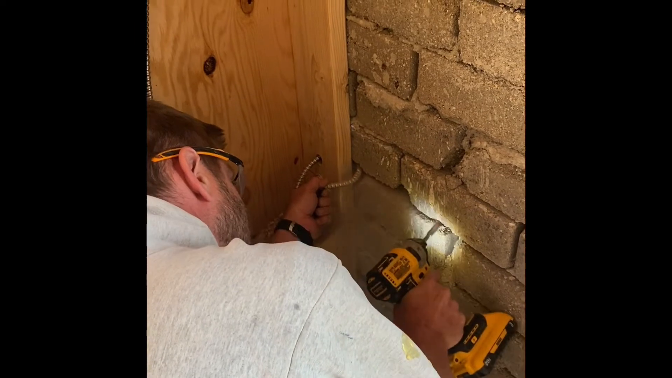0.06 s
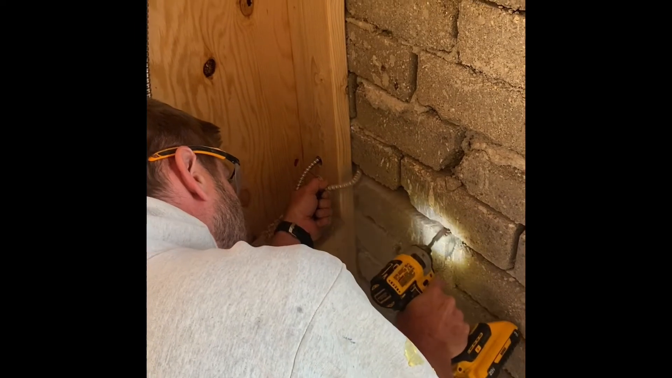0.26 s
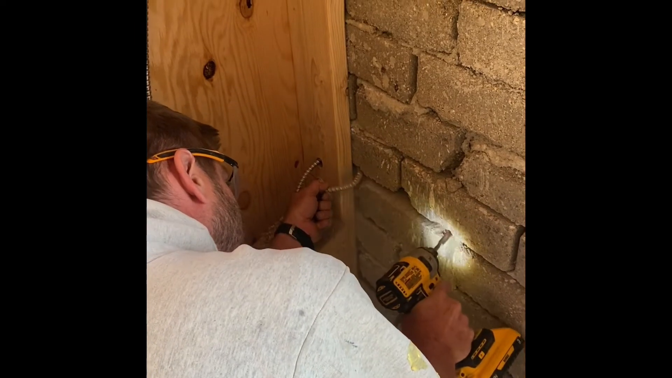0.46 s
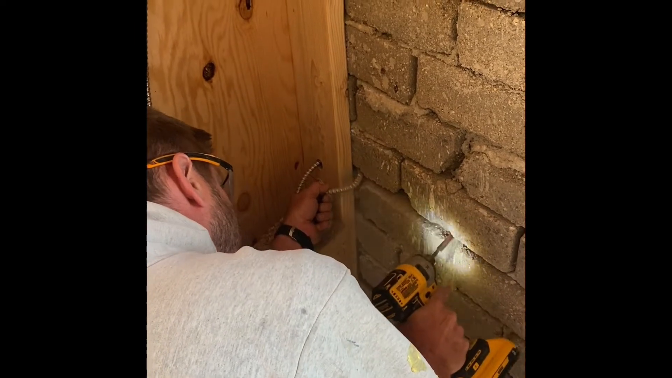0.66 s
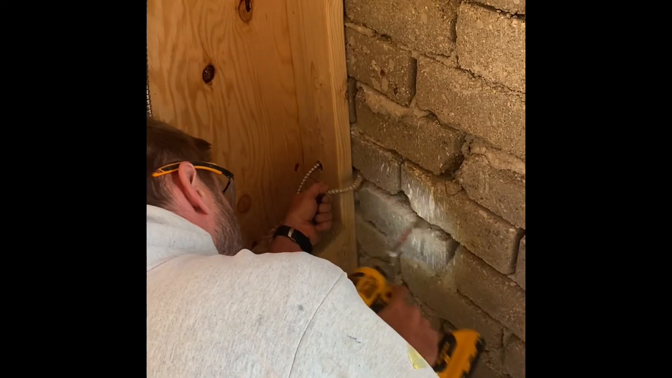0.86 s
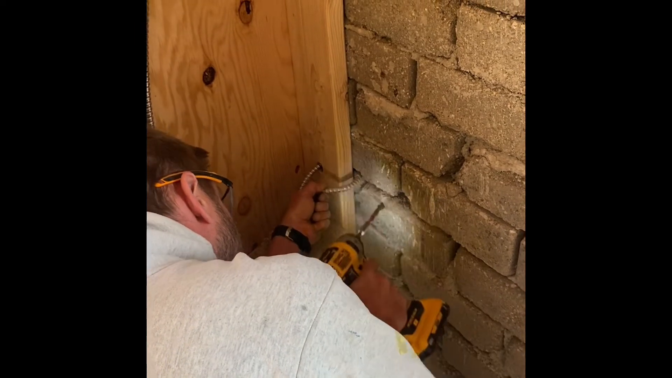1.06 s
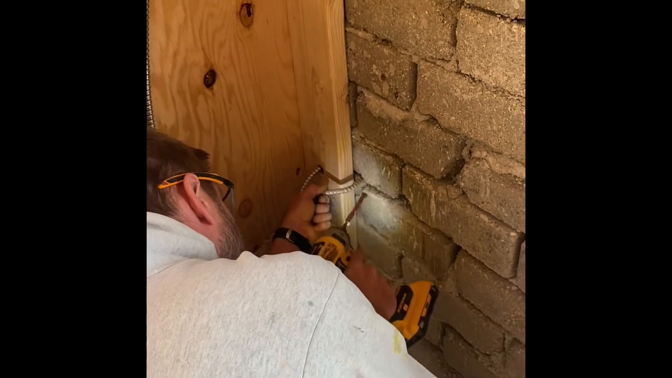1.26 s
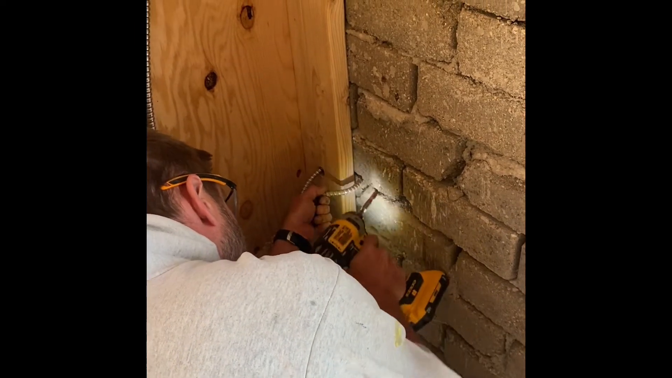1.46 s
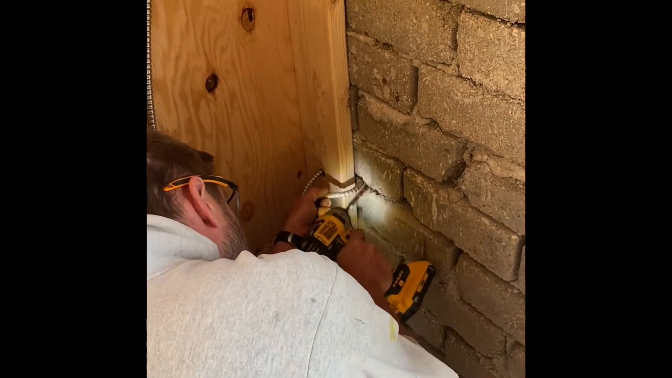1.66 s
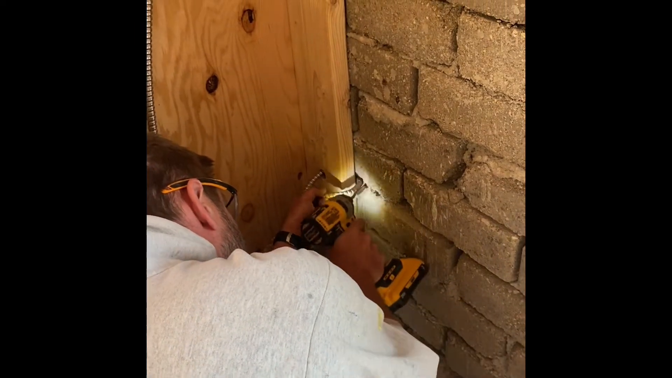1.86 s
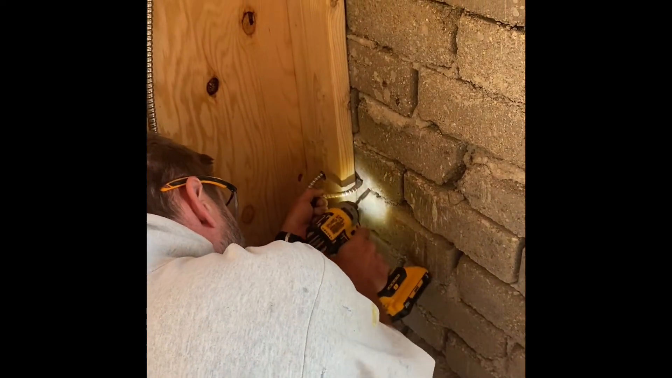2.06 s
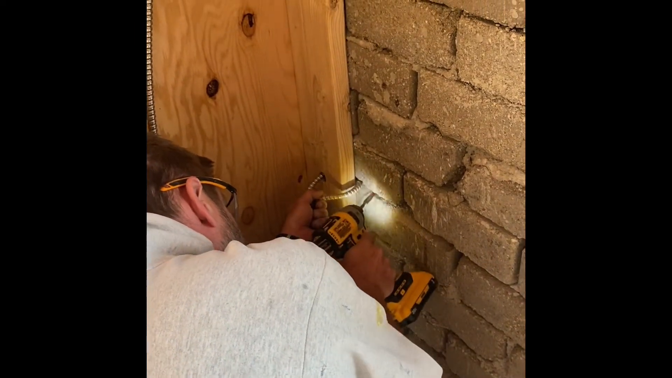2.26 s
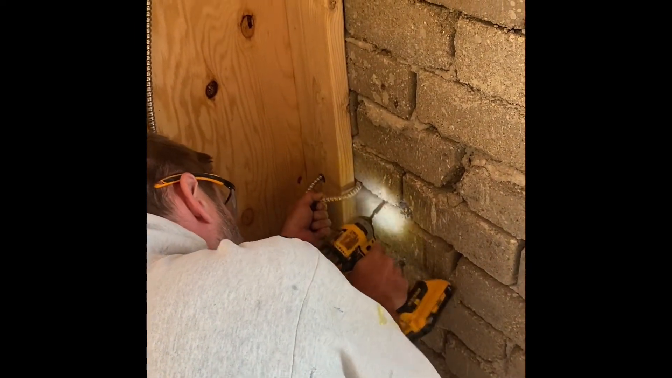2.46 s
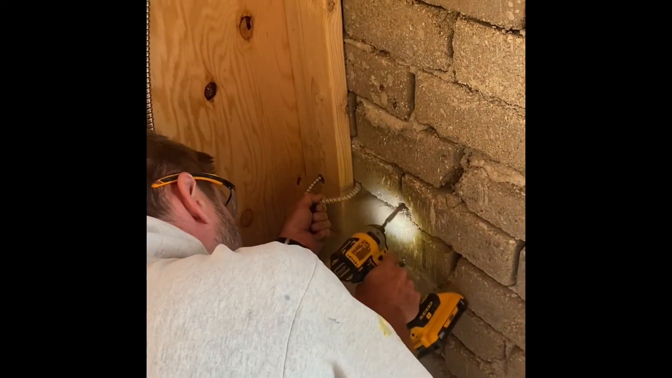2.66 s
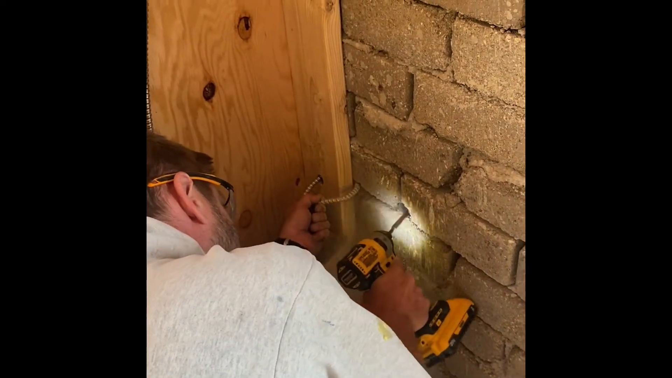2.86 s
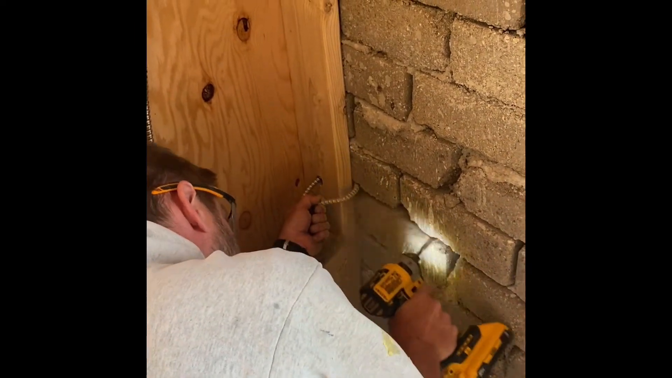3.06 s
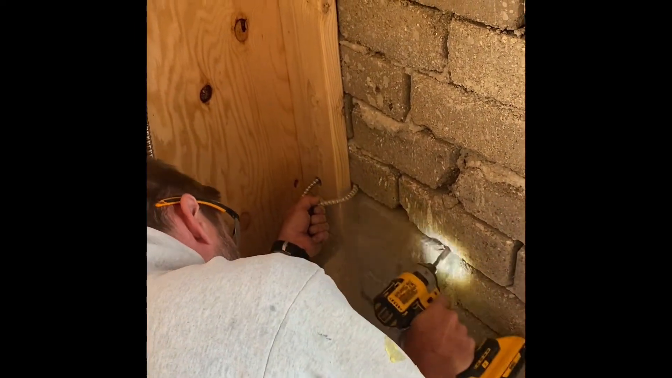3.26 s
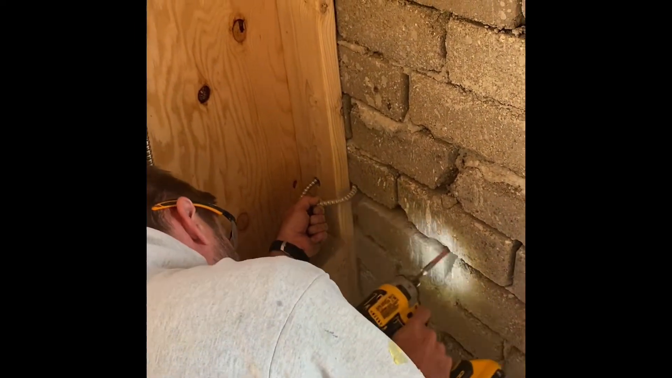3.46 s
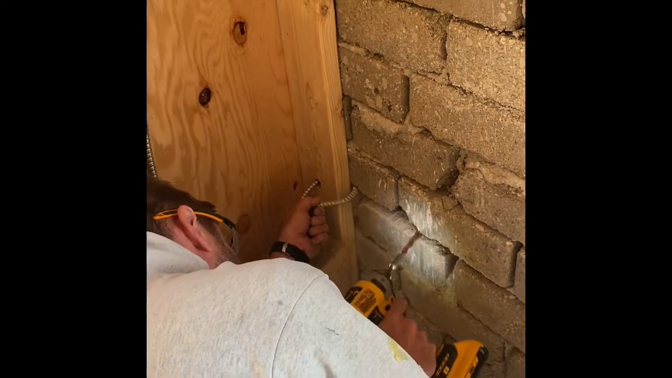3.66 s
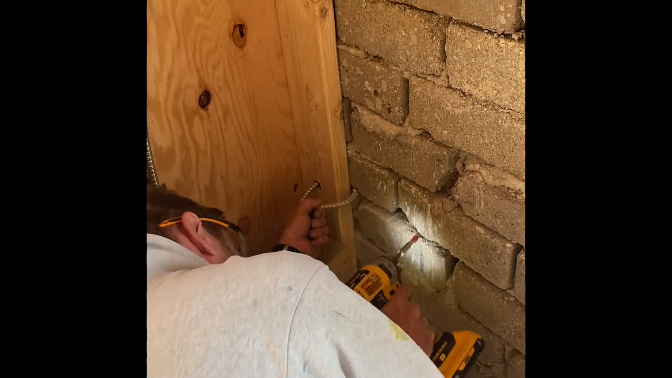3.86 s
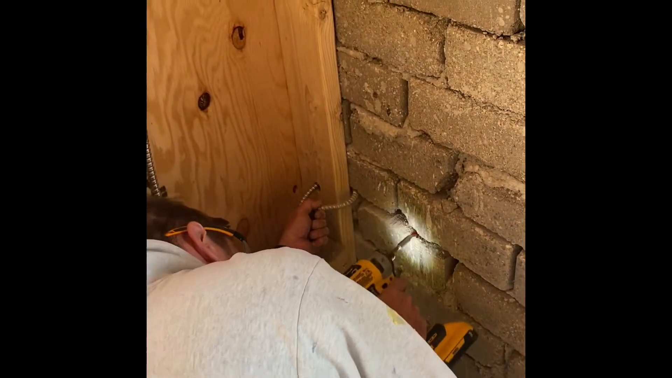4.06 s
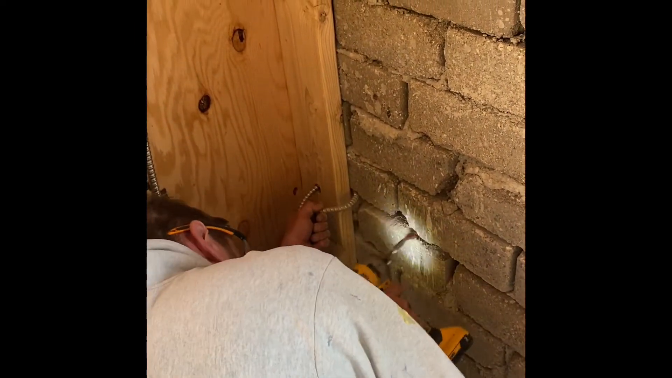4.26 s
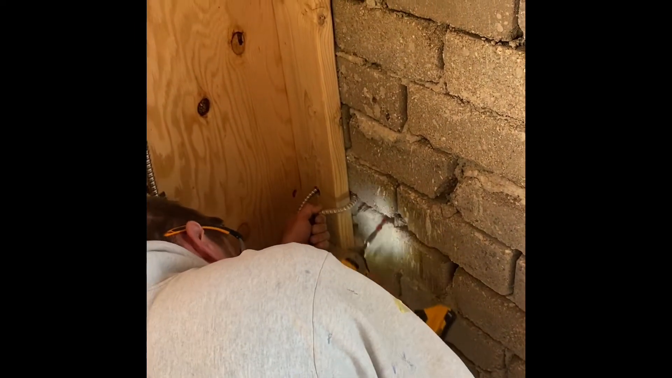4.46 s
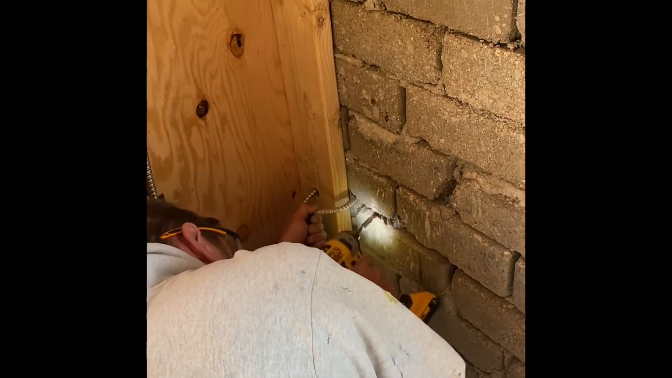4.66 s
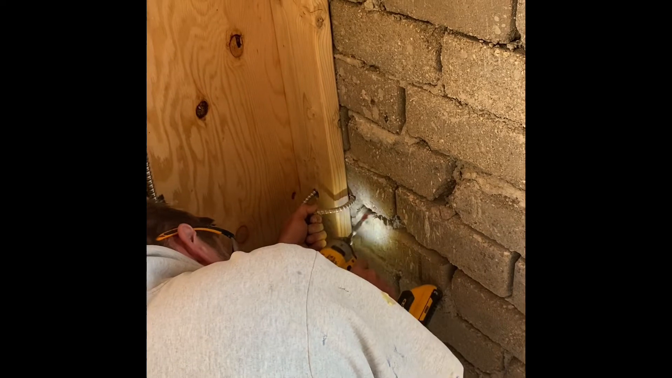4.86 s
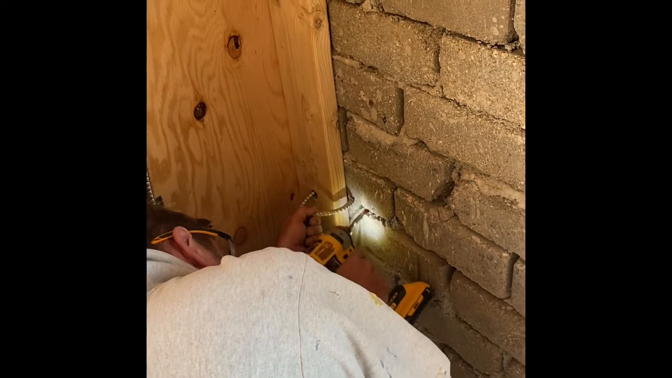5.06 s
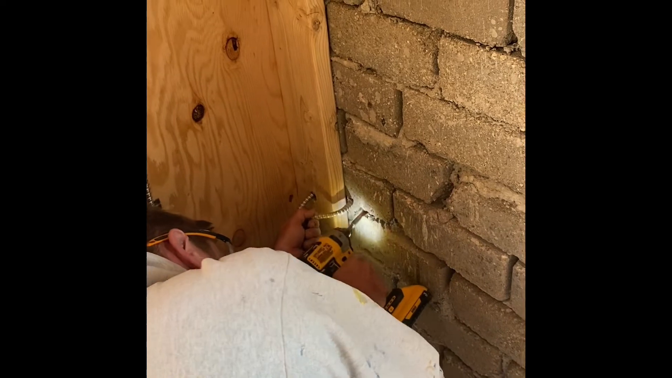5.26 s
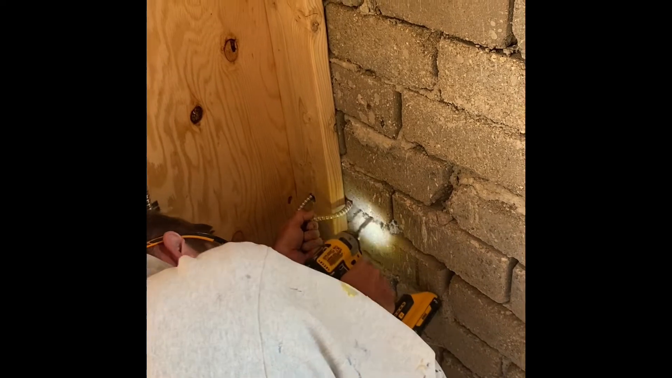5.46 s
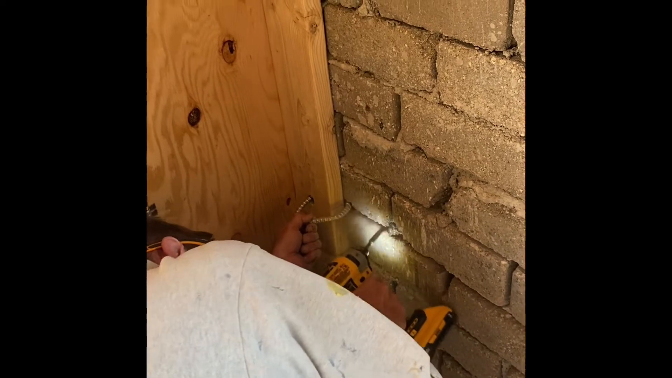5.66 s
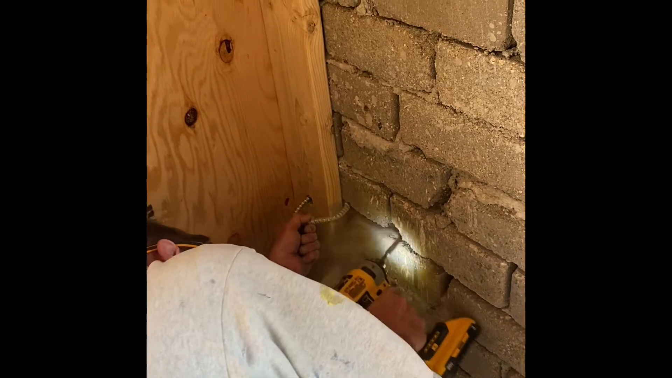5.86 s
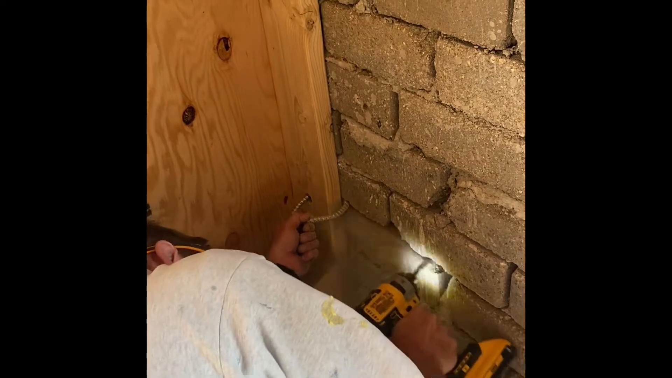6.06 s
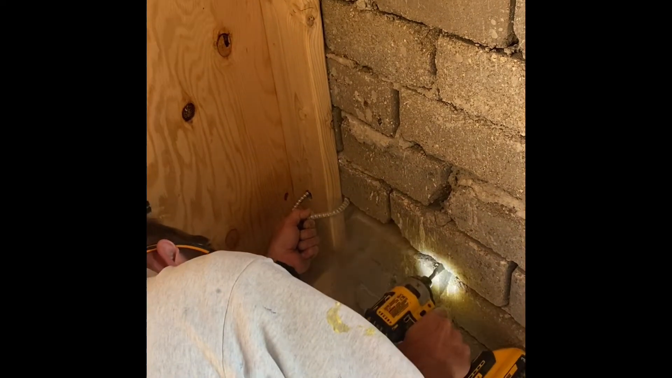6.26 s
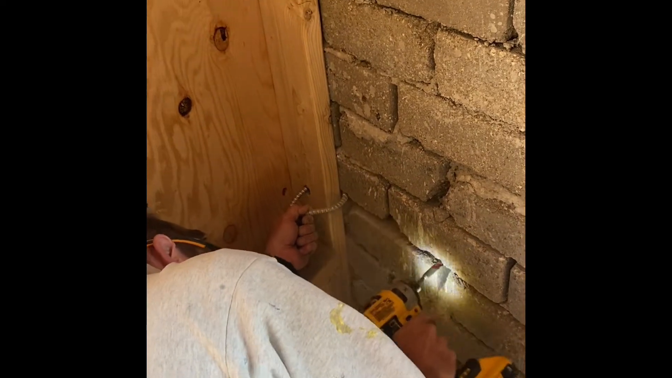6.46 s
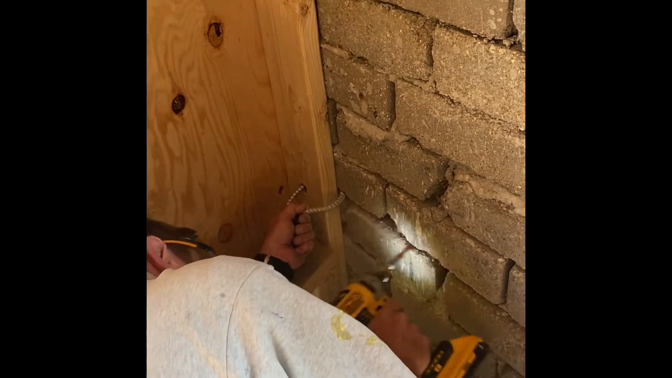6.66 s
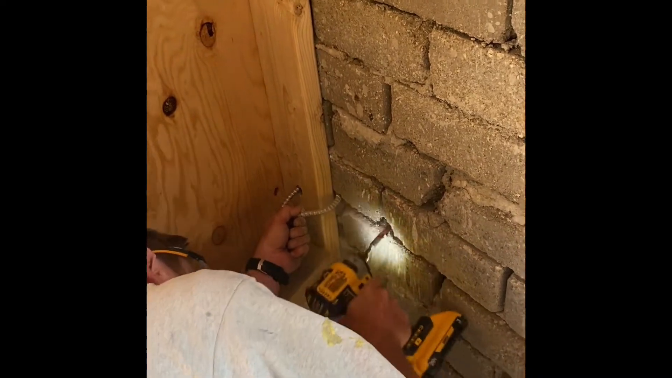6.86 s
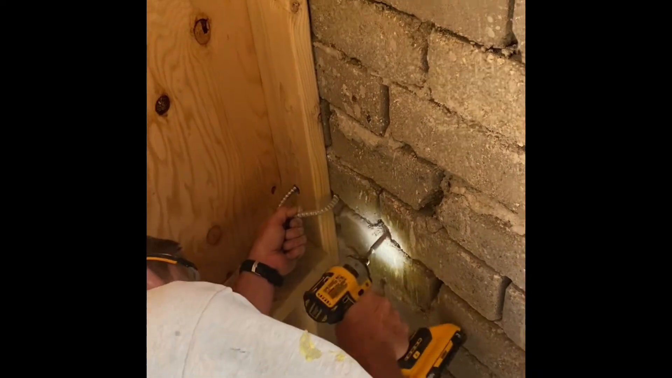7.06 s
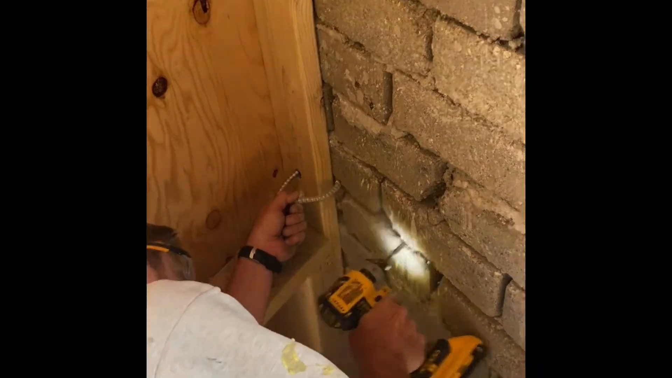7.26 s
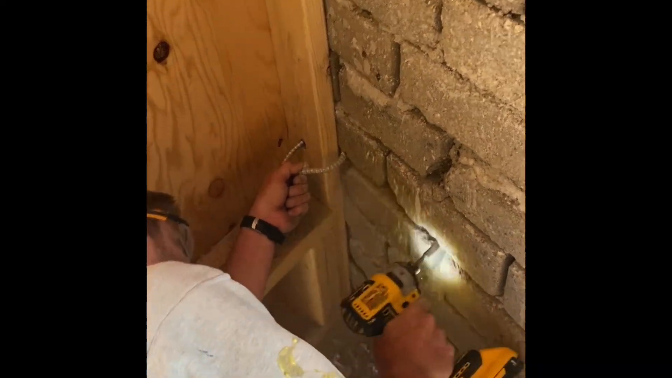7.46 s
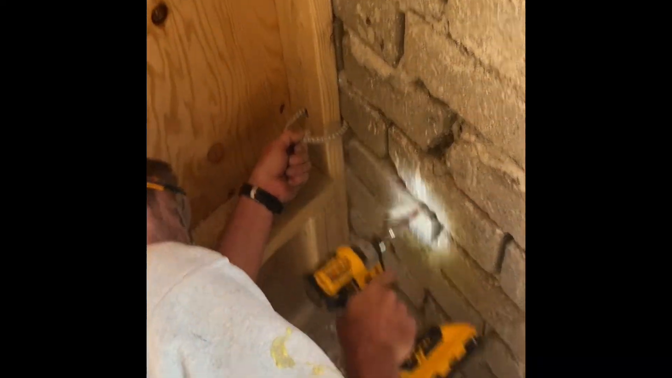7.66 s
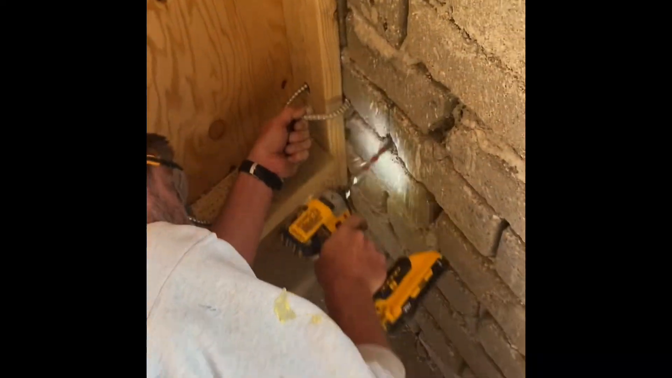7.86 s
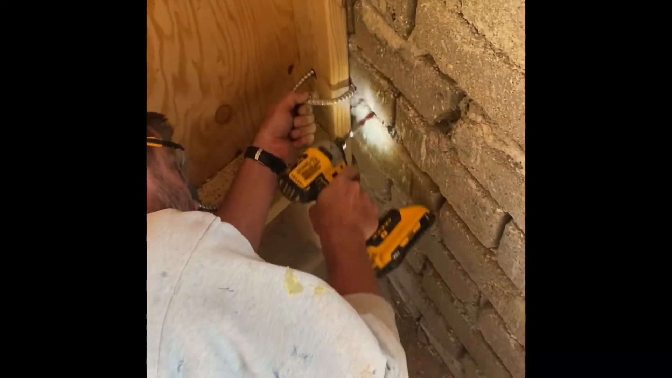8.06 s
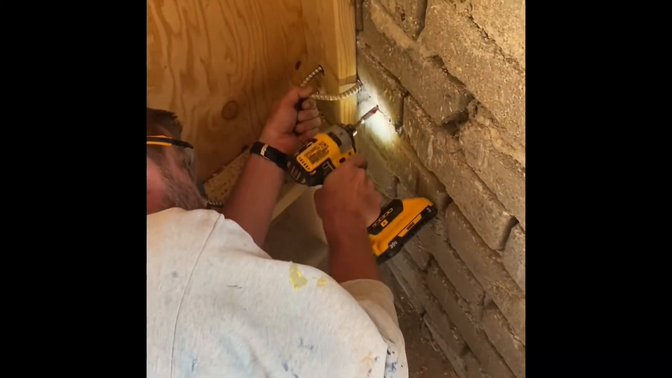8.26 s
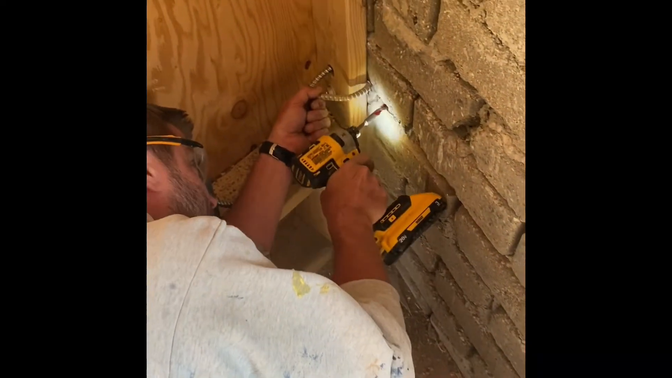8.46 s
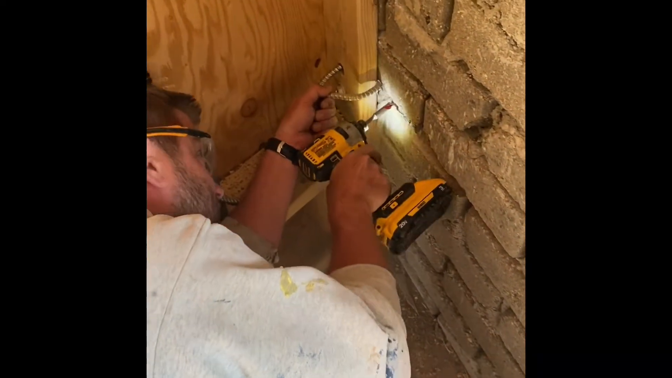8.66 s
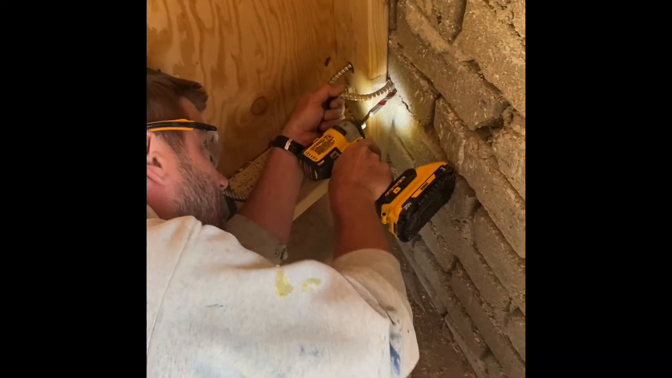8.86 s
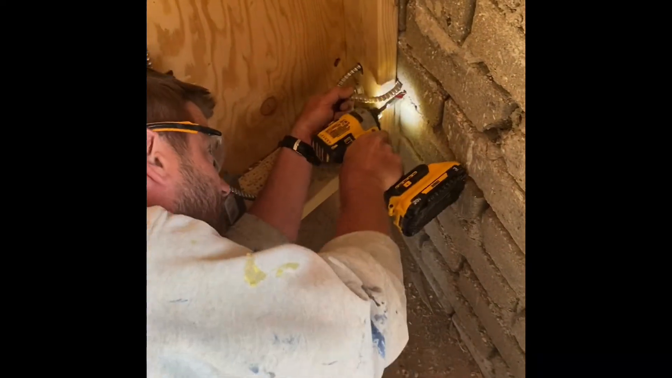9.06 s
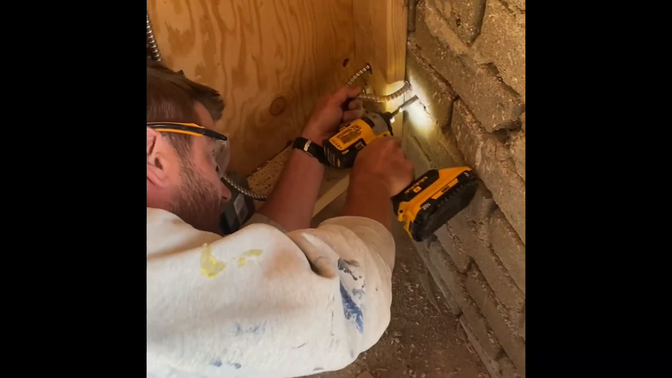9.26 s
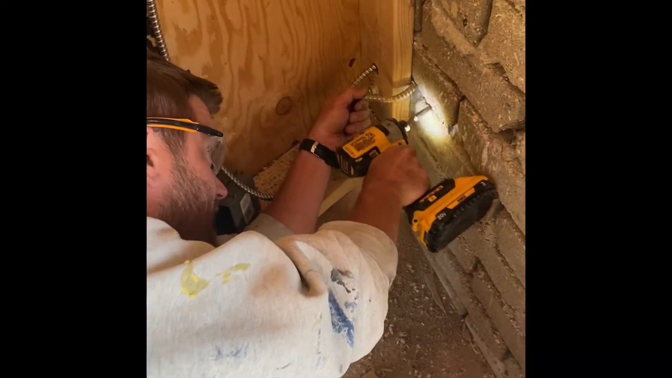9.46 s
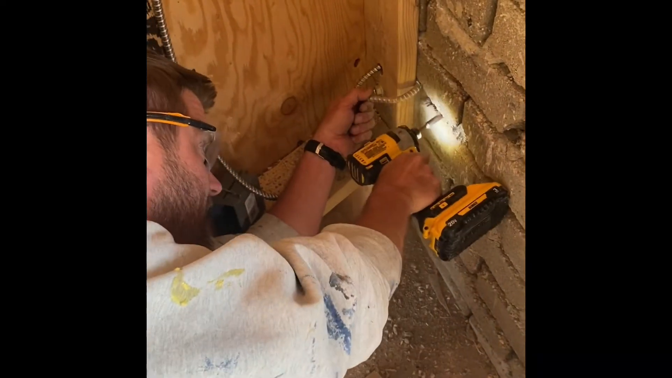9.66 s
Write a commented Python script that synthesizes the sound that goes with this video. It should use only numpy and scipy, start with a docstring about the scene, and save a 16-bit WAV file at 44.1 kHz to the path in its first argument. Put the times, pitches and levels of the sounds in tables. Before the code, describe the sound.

Five bursts of masonry drilling, close up in a corner between brick and wood. Each spins up quickly, chatters with coarse grit, sharp cracks and a low wall drone, then coasts down fast. Pauses bring scratchy dragging, dull taps, bright clinks, hollow panel knocks and soft shuffling. Near the end the stereo image shifts as the microphone turns toward the tip. Quiet air and a short room response lie underneath.

```python
"""A cordless drill bores into a mortar joint in five bursts, in a corner between a brick wall and a wooden panel.
It is already cutting at the start: gear tones whine and noise grains, pulsed by the bit's knocks, grind and ring.
After each of the first four bursts filtered noise scrapes and taps, sine modes ring the panel and boards bump.
From 7.6 s the stereo microphone swings to face the tip; the fifth burst, from 9.1 s, still runs at the end.
Near reflections and the room answer all along, over two channels of soft, still air."""
import sys
import numpy as np
from scipy import signal
from scipy.fft import rfft, irfft, next_fast_len
from scipy.io import wavfile

SR = 44100
rng = np.random.default_rng(int(sys.argv[2]) if len(sys.argv) > 2 else 0)


def transcribe(u):
    """Save the signal u as a 16-bit wav file named by the first command-line argument.

    u: samples, shape (n,) or (channels, n), limited to [-1, 1]; the rate is SR.
    q: integer samples, one column per channel.
    """
    v = np.clip(np.atleast_2d(u).T, -1, 1)
    q = np.round(v * 32767).astype(np.int16)
    wavfile.write(sys.argv[1], SR, q)


N = 427769
T = np.arange(N) / SR

# Trigger pulls. Each row: pulled in s, run-up in s, released in s, grinding level in dB,
# wall drone in dB relative to the grinding, rotor hum in dB, gear whine in dB, then the bit's two rings
# in that hole: low pitch in Hz, its level in dB, high pitch in Hz, its level in dB, both before they waver.
PULLS = [(-.2, .094, .688, -25.5, -7, -54, -34, 1160, -1, 5850, -9),
         (1.98, .14, 3.42, -24.4, -6.5, -60, -32.8, 1520, -8, 4630, -11),
         (5.23, .18, 6.385, -24.3, -6.5, -47, -34, 1330, -5, 5070, -7),
         (6.973, .125, 7.555, -25, -8.5, -39.5, -35, 1290, -3, 4900, -6),
         (9.122, .118, 9.884, -23.6, -5, -41, -39, 2450, -10, 8550, 0)]
# Colour of movement noise and bump clatter. Each row: frequency in Hz, level in dB.
SHUFFLE_COLOUR = [(25, -29), (50, -0.5), (85, 2), (150, 1), (240, -1), (380, -16), (700, -27.5),
                  (2000, -55.5)]
# Colour of dull taps and rubbing. Each row: frequency in Hz, level in dB.
DULL_COLOUR = [(200, 6), (500, 3), (1400, 3), (2100, -3.5), (3000, -5), (6000, -18)]

COAST_S = .09  # the motor stops this long after the trigger is let go


def undb(db):
    """Decibels to gain."""
    return 10 ** (np.asarray(db) / 20)


def unit(x):
    """Scale to rms 1."""
    return x / np.sqrt(np.mean(x ** 2))


def shape(points, hz):
    """Gain of a (Hz, dB) spectrum at the given frequencies, interpolated on a log scale."""
    f, db = np.transpose(points)
    return undb(np.interp(np.log(hz + 1), np.log(f), db))


def colour(x, points, size=1024):
    """Minimum-phase filter with the given spectrum; white noise keeps its power."""
    hz = np.arange(size + 1) * SR / (2 * size)
    cepstrum = irfft(np.log(shape(points, hz)))
    cepstrum[1:size] *= 2  # folding the cepstrum makes the filter causal
    cepstrum[size + 1:] = 0
    response = irfft(np.exp(rfft(cepstrum)))
    return signal.oaconvolve(x, response / np.linalg.norm(response))[:N]


def walk(rate):
    """Random wavering with a spread near 1, joining `rate` random points per second."""
    knots = rng.standard_normal(N // 10)
    return 1.2 * np.interp(T * rate, np.arange(len(knots)), knots)


def ramp(start, length):
    """A smooth step from 0 to 1."""
    u = np.clip((T - start) / length, 0, 1)
    return u * u * (3 - 2 * u)


def add(track, s, sound):
    """Mix a short sound into a track at time s."""
    i = max(int(s * SR), 0)
    track[i:i + len(sound)] += sound[:N - i]


def resonate(x, hz, width):
    """One resonance, gain 1 at its centre."""
    return signal.lfilter(*signal.iirpeak(hz, hz / width, fs=SR), x)


def grains(rate, spread_db):
    """Tiny fractures at random moments, a few much larger than the rest."""
    hit = rng.random(N) < rate / SR
    sign = rng.choice([-1, 1], N)
    size_db = spread_db * np.minimum(rng.exponential(size=N), 4)
    return unit(hit * sign * undb(size_db))


def noise_bursts(times, levels_db, rise, t60, crumble_db, crumble_t60):
    """Bursts of noise with a short swell and a quick decay, each followed by a trickle of crumbs."""
    out = np.zeros(N)
    t = T[:SR // 3] - T[SR // 50]  # the swell starts 20 ms ahead
    after = np.maximum(t, 0)
    swell = np.exp(np.minimum(t, 0) / rise)
    decay = undb(-60 * after / t60) + undb(crumble_db - 60 * after / crumble_t60)
    for s, db in zip(times, levels_db):
        add(out, s + t[0], undb(db) * swell * decay)
    noise = rng.uniform(-np.sqrt(3), np.sqrt(3), N)
    return out * noise * undb(2 * walk(250))


def motor():
    """Rotor and gear tones follow a wavering speed. Returns sound, relative speed, thrust and the wall's share."""
    # Motor and gear tones. Each row: multiple of the rotor speed, level in dB before it wavers.
    tones = [(2, -15), (3, -17), (4, -8.5), (5.4, -15), (6.3, -5.5), (8, .3), (12.4, -14), (18.4, -15),
             (21, -12)]
    motor_hz = 468.2  # full speed, before the wavering
    loose_speed = .055  # share of full speed below which the bit does not cut
    grind_power, drone_power = .44, 1.2  # the wall needs more speed before it drones
    build_db_per_s, whine_sag_db_per_s = .2, -1.8  # thrust grows and whine sinks during a burst
    ease_s, ease_db = .31, -3  # the hand eases off before each release
    whine_swing_db = 2  # the whine follows the depth of the bite by at most this much

    speed, thrust, shake, hum, whine = np.zeros((5, N))
    for pulled, run_up, released, grind_db, drone_db, hum_db, whine_db, *_ in PULLS:
        up, down = ramp(pulled, run_up), 1 - ramp(released, COAST_S)
        turning = up * down
        push_db = grind_db + build_db_per_s * (T - pulled) + ease_db * ramp(released - ease_s, ease_s)
        speed += turning
        thrust += (turning > loose_speed) * turning ** grind_power * undb(push_db)
        shake += turning ** drone_power * undb(drone_db)
        hum += turning ** 10 * undb(hum_db)  # the housing hums only near full speed
        # the gears sing under torque and hush when coasting
        whine += up ** 4 * down ** 8 * undb(whine_db + whine_sag_db_per_s * (T - pulled))

    # the speed is less steady while it runs up or coasts
    waver = .0027 * walk(25) + (.003 + .012 * (1 - speed)) * walk(220)
    angle = 2 * np.pi * np.cumsum(motor_hz * speed * (1 + waver)) / SR
    gears = sum(undb(db + 2.3 * walk(40)) * np.sin(k * angle + .25 * walk(300)) for k, db in tones)
    rotor = undb(4.5 * np.minimum(walk(30), 1.3)) * np.sin(angle + .7 * walk(90))
    load = undb(np.clip(bite(), -whine_swing_db, whine_swing_db))
    return hum * rotor + whine * load * gears, speed, thrust, shake


def bite():
    """How much deeper than usual the bit cuts, in dB; negative where it slips."""
    # Changes of depth. Each row: middle in s, length in s, change in dB.
    depths = [(0.435, 0.17, -1.5), (0.587, 0.058, 3.5), (2.172, 0.28, -1.5), (2.354, 0.11, 3),
              (2.573, 0.083, -3.5), (2.782, 0.14, 2), (3.05, 0.54, -1), (3.243, 0.092, 1),
              (5.496, 0.052, 0), (5.695, 0.3, -3), (6.006, 0.056, 2.5), (7.12, 0.1, 1), (7.26, 0.033, 5.5),
              (7.605, 0.019, 8), (9.476, 0.11, 1.5)]
    return sum(db * np.exp(-(2 * (T - s) / length) ** 2) for s, length, db in depths)


def boring(speed, thrust, shake):
    """The edges knock unevenly; each knock crushes a cluster of grains and shakes the wall; hard grains crack."""
    # Colours of crushed mortar, fine grit, shaken wall and splitting grains.
    # Each row of these four: frequency in Hz, level in dB.
    crush_colour = [(300, -24), (700, -7.5), (900, -5.5), (1300, -3.5), (1800, -4), (2200, -4), (2900, -1),
                    (3300, 0), (4100, -3.5), (4600, -2.5), (5800, -1), (6500, -4.5), (9000, -17)]
    grit_colour = [(3500, -25), (6000, -5), (7400, -2), (8500, 2), (9400, -1), (10000, -1), (11000, -5),
                   (12300, -7), (13500, -4.5), (15000, -8), (16000, -13)]
    drone_colour = [(30, -26), (70, -5), (130, 0), (230, -1), (330, -1.5), (500, -2.5), (600, -3),
                    (900, -16), (1800, -18)]
    splinter_colour = [(400, -15), (1300, -6), (3000, -4), (5000, 0), (7000, -4), (8700, -2), (12000, -9),
                       (16000, -13)]
    # The bit catches on a hard grain. Each row: time in s, level in dB before the trim.
    catches = [(.123, -12), (.423, -15.5), (.542, -15), (.576, -21), (.607, -10.5), (2.0136, -12),
               (2.243, -16), (2.355, -30), (2.456, -4), (2.783, -19.5), (2.9858, -14), (3.026, -14),
               (5.264, -31), (5.511, -10), (5.677, -13), (5.85, -11), (5.866, -9), (5.896, -9), (6.007, -7),
               (6.017, -17), (6.1246, -11), (6.996, -26), (7.258, -20), (7.2587, -12), (7.268, -7),
               (7.279, -9.5), (7.2858, -9), (7.2946, -11.5), (7.407, -20), (7.412, -19), (9.148, -16),
               (9.2928, -8.5), (9.373, -12), (9.384, -9.5), (9.5135, -5), (9.5223, -8), (9.532, -11.5)]
    # How hard the knocks bite, in a repeating cycle: one column, level in dB before random strength.
    turn_db = [2.5, -2.5, -1.5]
    chatter_hz = 105.33  # knocks per second at full speed, before the wavering
    chatter_depth, depth_per_db = 1.56, .5  # knocks stand out more when the bit bites deep
    crush_db, grit_db, catch_trim_db = 1.5, -2, -1.5

    beat = np.cumsum(chatter_hz * speed * (1 + .07 * walk(60))) / SR
    knock = beat.astype(int)
    chance = np.clip(rng.standard_normal(N // 100), -2, 1)[knock]
    strength = undb(3 * chance + np.take(turn_db, knock, mode="wrap"))
    depth = np.maximum(chatter_depth + depth_per_db * bite(), 1)
    pulse = np.exp(-(beat % 1) / .28)
    pressure = (1 + depth * speed * strength * pulse) / (1 + .3 * depth)
    running_rms = np.sqrt(np.mean(pressure[speed > .5] ** 2))
    force = pressure / running_rms * thrust * undb(bite() + .6 * walk(60))

    crush = steel(colour(force * grains(rate=9000, spread_db=.5), crush_colour))
    grit = colour(force * undb(2 * walk(90)) * grains(rate=20000, spread_db=2), grit_colour)
    drone = colour(force * shake * grains(rate=3000, spread_db=1.5), drone_colour)
    s, db = np.transpose(catches)
    catch = noise_bursts(s, db + catch_trim_db, rise=.0007, t60=.012, crumble_db=-22, crumble_t60=.05)
    grinding = undb(crush_db) * crush + undb(grit_db) * grit
    return grinding + rings(grinding) + drone + colour(catch, splinter_colour)


def steel(x):
    """A force on the tip is heard directly and through the resonances of bit and chuck."""
    # Ringing of bit and chuck. Each row: frequency in Hz, width in Hz, level in dB.
    modes = [(1232, 210, -13), (1670, 530, -8.5), (2090, 60, -14), (2940, 200, -14), (5650, 500, -13)]
    return x + sum(undb(db) * resonate(x, hz, width) for hz, width, db in modes)


def rings(grinding):
    """Each hole grips the bit differently, so it rings at other pitches in every burst."""
    # Widths of the low and the high ring: one column, width in Hz.
    widths_hz = [150, 380]
    waver_db = 2
    out = np.zeros(N)
    for pulled, _, released, *_, low_hz, low_db, high_hz, high_db in PULLS:
        burst = grinding * (T > pulled) * (T < released + COAST_S)
        for hz, width, db in zip((low_hz, high_hz), widths_hz, (low_db, high_db)):
            out += undb(db + waver_db * walk(7.4)) * resonate(burst, hz, width)
    return out


def rough_tones():
    """Gears sweeping up at starts, squeals at stalls, tonal scrapes in pauses: swelling sines with gliding pitch."""
    # Each row: middle in s, pitch there in Hz, glide in octaves per s, length at half height in s, level in dB.
    glides = [(2.035, 1500, 0, .03, -31), (2.075, 2550, 2, .02, -29), (3.465, 1480, 0, .03, -36),
              (5.305, 1650, 1, .009, -19), (5.335, 1650, 3, .016, -24), (5.346, 2780, 0, .012, -25),
              (6.415, 2640, 0, .045, -30), (6.796, 720, -6, .006, -33), (7.03, 1320, 2, .022, -27),
              (7.056, 2600, 3, .014, -30), (7.08, 1720, 7, .035, -28), (7.59, 2700, -3, .03, -31),
              (7.68, 1250, 0, .015, -44), (7.895, 1030, -1, .04, -50), (9.17, 2650, 0, .02, -28),
              (9.188, 1760, 9, .011, -17), (9.196, 2600, 10, .011, -15), (9.208, 3150, 11, .016, -25),
              (9.216, 2650, 4, .018, -17.5), (9.232, 1790, 1, .03, -24)]
    rough = .02  # spread of the pitch jitter as a share of the pitch
    out = np.zeros(N)
    for s, hz, glide, length, db in glides:
        swell = np.hanning(int(2 * length * SR))
        t = T[:len(swell)] - length
        pitch = hz * 2 ** (glide * t) * (1 + rough * walk(500)[:len(t)])
        add(out, s - length, undb(db) * swell * np.sin(2 * np.pi * np.cumsum(pitch) / SR))
    return out


def handling():
    """The tip scrapes, rubs and taps along the joint while the worker shuffles: grains and noise under swells."""
    # Colour of the scraping tip. Each row: frequency in Hz, level in dB.
    scrape_colour = [(200, -8), (500, -2), (900, -3), (2000, 0), (4500, -1), (7000, -6), (9000, -4),
                     (12000, -9), (16000, -12)]
    drag, shift = movements()
    scrape = colour(grains(rate=700, spread_db=4.5) * drag * undb(4 * walk(45) - 1), scrape_colour)
    rub = colour(grains(rate=1500, spread_db=2.5) * drag * undb(4 * walk(25)), DULL_COLOUR)
    shuffle = colour(rng.standard_normal(N) * shift, SHUFFLE_COLOUR)
    return scrape + undb(-.5) * rub + shuffle + taps(drag)


def movements():
    """Each movement starts quickly, slackens and dies away. Returns the strength of scraping and shuffling."""
    # Each row: start in s, length in s, scrape level in dB, shuffling level in dB.
    moves = [(0.766, 0.036, -46.5, -40), (0.958, 0.18, -58, -46), (1.433, 0.061, -55, -44),
             (1.745, 0.17, -59, -59), (1.958, 0.047, -50.5, -61), (3.473, 0.13, -48.5, -53),
             (3.78, 0.15, -57, -55.5), (3.97, 0.14, -56, -47), (4.24, 0.24, -53.5, -55),
             (4.532, 0.084, -57, -43.5), (4.805, 0.28, -54.5, -48), (5.201, 0.05, -60, -43),
             (6.44, 0.31, -52.5, -52), (6.853, 0.12, -58, -49), (7.596, 0.058, -47, -48),
             (7.825, 0.091, -58, -59), (8.058, 0.27, -62.5, -47.5), (8.406, 0.21, -56, -47.5),
             (8.706, 0.1, -56.5, -45.5), (8.818, 0.077, -55, -40), (9.01, 0.11, -60, -48)]
    attack_s, sag_db_per_s, release_db_per_s = .036, -5, -140
    drag, shift = np.zeros((2, N))
    for s, length, scrape_db, shuffle_db in moves:
        sag_db = sag_db_per_s * np.clip(T - s, 0, length)
        release_db = release_db_per_s * np.maximum(T - s - length, 0)
        effort = ramp(s - attack_s / 2, attack_s) * undb(sag_db + release_db)
        drag += effort * undb(scrape_db)
        shift += effort * undb(shuffle_db)
    return drag, shift


def taps(drag):
    """The tip strikes the wall: dull knock, bright crack, short clink; light ticks come as it skips along."""
    # Strikes. Each row: time in s, dull level in dB, bright level in dB, both before the trims.
    strikes = [(0.92, -46, -47), (1.084, -42, -46), (1.093, -41, -30.5), (1.116, -46, -28),
               (1.247, -55, -55), (1.42, -57, -53.5), (1.5, -66, -39), (1.757, -37, -39),
               (1.817, -40, -32.5), (1.942, -45, -32), (1.992, -48, -28), (3.52, -40, -35),
               (3.586, -43, -38), (3.629, -59, -49), (3.773, -42, -41.5), (4.033, -35.5, -29.5),
               (4.285, -40, -43), (4.415, -41, -66), (4.582, -37.5, -27.5), (4.696, -56, -44.5),
               (4.957, -50, -56), (5.054, -41.5, -36.5), (5.099, -50, -36.5), (5.216, -60, -44.5),
               (6.636, -37.5, -49), (6.654, -46, -54), (6.675, -45, -58), (6.884, -41, -30),
               (6.898, -62, -34), (7.665, -43, -47), (7.682, -59, -52), (7.842, -52, -48),
               (8.018, -51.5, -49), (8.131, -40, -37.5), (8.188, -47, -42.5), (8.353, -45, -41),
               (8.438, -68, -42), (8.562, -48, -37.5), (8.58, -52, -32), (8.781, -45, -42),
               (8.846, -43, -53), (9.034, -50, -41), (9.06, -60, -43), (9.127, -40, -25)]
    # Colour of the bright part. Each row: frequency in Hz, level in dB.
    bright_colour = [(1200, -22), (2600, -3), (4200, 0), (6500, -5), (9000, -3), (12000, -8), (16000, -12)]
    # What a tap rings with. Each row: frequency in Hz, 60 dB decay in s, level in dB before normalizing.
    clink_modes = [(920, 0.14, -4.5), (1120, 0.028, -6), (1300, 0.049, -13), (1665, 0.047, 14.5),
                   (2120, 0.033, -10), (2800, 0.041, -3)]
    dull_trim_db, bright_trim_db, clink_db = -4.5, .5, -17.5
    ticks_per_s, tick_db = 20, 6  # random moments, heard while the tip is dragged; mean level re the drag

    s, dull_db, bright_db = np.transpose(strikes)
    knocks = noise_bursts(s, dull_db, rise=.0017, t60=.012, crumble_db=-7.5, crumble_t60=.18)
    chips = noise_bursts(s, bright_db, rise=.002, t60=.008, crumble_db=-18, crumble_t60=.12)
    moments = rng.integers(0, N, int(ticks_per_s * N / SR))
    ticks_db = tick_db + 3 * rng.standard_normal(len(moments))
    skips = noise_bursts(moments / SR, ticks_db, rise=.0006, t60=.012, crumble_db=-13, crumble_t60=.07)
    ticks = drag * skips

    t = T[:SR // 5]
    ring = sum(undb(db - 60 * t / t60) * np.sin(2 * np.pi * hz * t) for hz, t60, db in clink_modes)
    clinks = signal.oaconvolve(knocks, ring / np.linalg.norm(ring))[:N]
    dull = undb(dull_trim_db) * colour(knocks, DULL_COLOUR)
    bright = colour(undb(bright_trim_db) * chips + ticks, bright_colour)
    return steel(dull + bright) + undb(clink_db) * clinks


def panel():
    """The tool knocks on the wood: a short thud with a hollow note, then the fluttering ring of the panel."""
    # Knocks. Each row: time in s, level in dB before the trims, ring time as a multiple of the panel's own,
    # note of the contact in Hz.
    blows = [(0.806, -37, 1, 650), (1.678, -30, 2, 1350), (1.83, -34, .9, 1250), (3.835, -30, .35, 700),
             (3.868, -27, .2, 1950), (3.99, -26.5, .25, 1950), (4.818, -27, .3, 1950),
             (6.87, -43, .5, 1300), (7.728, -27, .25, 1250), (7.983, -46, .4, 1300), (8.109, -33, .3, 650),
             (8.846, -34, .25, 2400)]
    # What the panel rings with. Each row: frequency in Hz, own 60 dB decay in s, level in dB before scatter.
    modes = [(425, .15, -3), (720, .06, -8), (900, .04, -7), (1110, .04, -4), (1280, .07, 1),
             (1480, .04, -1), (1660, .03, -4), (2040, .025, -7)]
    # Colour of the thud. Each row: frequency in Hz, level in dB.
    thud_colour = [(200, 8.5), (500, 8), (1300, 8.5), (2200, -2.5), (4000, -8.5), (7000, -10), (14000, -15)]
    ring_trim_db, contact_db, thud_db = -11, -4, -8
    scatter_db = -3.5  # each spot of the panel favours other modes
    # the tool stays against the wood, so the ring flutters in level (dB) and pitch (share of it)
    rattle_db, rattle_bend = 8, .028
    contact_width_hz = 340

    out, t = np.zeros(N), T[:SR // 4]
    for start, peak_db, sustain, contact_hz in blows:
        for hz, t60, db in modes:
            flutter, bend = walk(120)[:len(t)], walk(90)[:len(t)]
            mode_db = db + scatter_db * rng.standard_normal() + rattle_db * np.minimum(flutter, 1)
            ring_db = peak_db + ring_trim_db + mode_db - 60 * t / (t60 * sustain)
            swing = np.sin(2 * np.pi * np.cumsum(hz * (1 + rattle_bend * bend)) / SR)
            add(out, start, undb(ring_db) * (1 - np.exp(-t / .0022)) * swing)
        contact_noise = rng.standard_normal(len(t)) * undb(-60 * t / .026)
        note = resonate(contact_noise, contact_hz, contact_width_hz)
        add(out, start, undb(peak_db + contact_db) * note / np.abs(note).max())
    s, levels_db, *_ = np.transpose(blows)
    thuds = noise_bursts(s, levels_db, rise=.0012, t60=.024, crumble_db=-15, crumble_t60=.2)
    return out + undb(thud_db) * colour(thuds, thud_colour)


def bumps():
    """Arm or tool bumps the woodwork: a board swings at its own pitch, with a duller clatter around it."""
    # Each row: time in s, level in dB before the trims, pitch in Hz.
    blows = [(0.984, -38, 112), (1.436, -32, 223), (1.758, -28, 239.6), (1.779, -34.5, 190),
             (2.043, -26.5, 215), (2.282, -20, 68.4), (3.872, -43, 180), (3.992, -34, 139),
             (4.491, -39, 340), (4.572, -30.5, 126), (4.825, -37, 320), (5.527, -24.5, 283),
             (5.679, -16, 67), (5.728, -24, 45.2), (6.715, -37.5, 90), (6.861, -35, 257),
             (8.101, -29.5, 221), (8.832, -38, 211), (9.042, -27.5, 121), (9.378, -24.5, 302)]
    board_db, clatter_db = -1.5, -11.5
    out, t = np.zeros(N), T[:SR // 2]
    s, db, pitch = np.transpose(blows)
    for start, peak_db, hz in zip(s, db, pitch):
        fade = undb(peak_db - 60 * t / .18) * (1 - np.exp(-t / .00059))
        add(out, start, fade * np.sin(2 * np.pi * hz * t))
    clatter = noise_bursts(s, db, rise=.0037, t60=.045, crumble_db=-3, crumble_t60=.76)
    return undb(board_db) * out + undb(clatter_db) * colour(clatter, SHUFFLE_COLOUR)


def corner(work, whine, room_db):
    """The microphone swings to face the tip, shifting phase and lean; near walls answer, then the room."""
    # Phase of the port pair before and after the swing. Each row: frequency in Hz, lead of the left in radians.
    phase_before = [(0, 0), (400, .2), (1000, 3.1), (2000, 6.3), (3100, 9.4), (4200, 12.4), (4700, 15.2),
                    (6600, 14.8), (9000, 15.7), (12000, 16), (15500, 18)]
    phase_after = [(0, 0), (400, .2), (950, 3.8), (1900, 5.4), (2300, 5.1), (2900, 7.3), (3400, 5.4),
                   (4200, 5.4), (5000, 4.3), (5800, 1.6), (9000, 3.1), (12000, 3.4), (15500, 5.5)]
    # Lean before and after. Each row: frequency in Hz, dB added to the left and taken from the right.
    lean_before = [(350, -.5), (900, 5), (1800, 3), (2500, 2), (3200, 3.2), (4500, 2), (5500, 0)]
    lean_after = [(350, 0), (950, 5), (1800, 1.5), (2600, -3.5), (3200, 2), (4300, -2.2), (5500, 1),
                  (8000, 0)]
    swing_at_s, swing_s = 7.6, .4
    work_db, near_db = -3, -3  # near reflections are relative to the direct sound

    swung = ramp(swing_at_s, swing_s)
    before = np.sqrt(1 - swung) * ports(work, phase_before, lean_before)
    after = np.sqrt(swung) * ports(work, phase_after, lean_after)
    # tool and body keep moving, so the pattern of near reflections keeps changing
    paths = np.array([walk(12) for _ in range(5)])
    weights = paths / np.linalg.norm(paths, axis=0)
    near = sum(w * echoes(work, .022, [(200, -10), (700, 0)]) for w in weights)
    room = echoes(work + whine, .17, [(100, -22), (300, 11.5), (3000, -3), (12000, -8.5)])
    return undb(work_db) * (before + after + undb(near_db) * near) + whine + undb(room_db) * room


def ports(work, phase, lean):
    """The direct sound at the two ports for one position: the right lags in phase and the levels lean apart."""
    size = next_fast_len(N)
    hz = np.arange(size // 2 + 1) * SR / size
    lead = np.interp(hz, *np.transpose(phase))
    left = shape(lean, hz)
    pair = np.array([left, np.exp(-1j * lead) / left])
    return irfft(rfft(work, size) * pair, size)[:, :N]


def echoes(x, t60, band):
    """A dense decaying noise tail, different at each port, coloured by a (Hz, dB) spectrum."""
    t = T[:SR // 3]
    tail = rng.standard_normal((2, len(t))) * (t > .002) * undb(-60 * t / t60)
    spectrum = rfft(tail / np.linalg.norm(tail[0]))
    tail = irfft(spectrum * shape(band, np.fft.rfftfreq(len(t), 1 / SR)))
    tail = tail[:, :len(t) * 9 // 10]  # drop the wrapped end
    return signal.oaconvolve(x[None], tail, axes=1)[:, :N]


def scene():
    """Drill and handling in the corner, over the still air of the room."""
    # Colour of the air. Each row: frequency in Hz, level in dB.
    air_colour = [(25, -15), (65, -2.5), (170, -5.5), (300, -22.5), (1000, -30), (3000, -41), (8000, -38),
                  (16000, -51)]
    air_db = -58.5
    whine, speed, thrust, shake = motor()
    work = boring(speed, thrust, shake) + rough_tones() + handling() + panel() + bumps()
    air = np.array([colour(rng.standard_normal(N), air_colour) for _ in range(2)])
    return corner(work, whine, room_db=-13) + undb(air_db) * air


def record(dry):
    """The pair narrows the bass, sets left against right around 10 kHz, rounds the peaks and cuts both ends."""
    # Stereo width. Each row: frequency in Hz, side level relative to mid in dB.
    width_curve = [(60, -25), (130, -16), (280, -7), (600, 0), (1300, -1.5), (4000, -.5), (7000, 1),
                   (8300, 5), (9300, 22), (10300, 32), (11400, 20), (12200, 3), (15000, -1)]
    bottom_hz, top_hz = 46, 15700
    size = next_fast_len(N)
    width = shape(width_curve, np.arange(size // 2 + 1) * SR / size)
    mid, side = rfft([dry[0] + dry[1], dry[0] - dry[1]], size) / 2
    # above 0 dB the mid is lowered, below it the side
    mid, side = mid / np.maximum(width, 1), side * np.minimum(width, 1)
    pair = irfft(np.array([mid + side, mid - side]), size)[:, :N]
    rounded = np.tanh(pair)
    low_cut = signal.butter(4, bottom_hz, "high", fs=SR, output="sos")
    high_cut = signal.ellip(10, .2, 80, top_hz, fs=SR, output="sos")
    return signal.sosfilt(high_cut, signal.sosfilt(low_cut, rounded))


dry = scene()
out = record(dry)
transcribe(out)
```